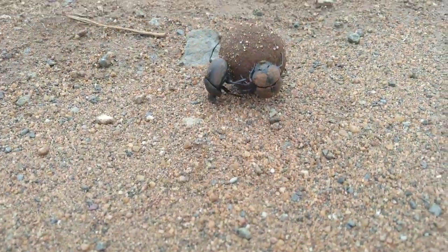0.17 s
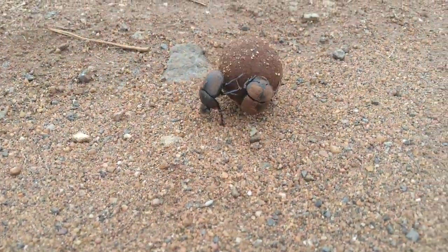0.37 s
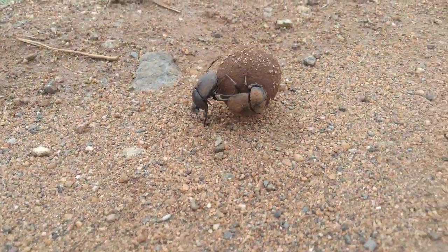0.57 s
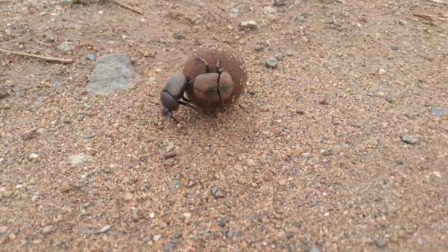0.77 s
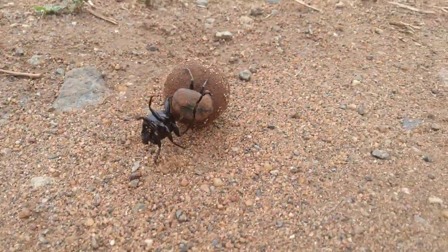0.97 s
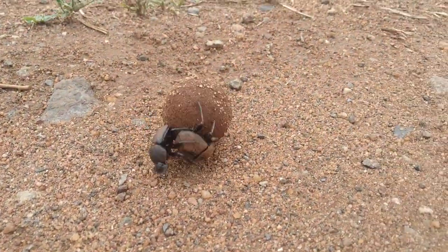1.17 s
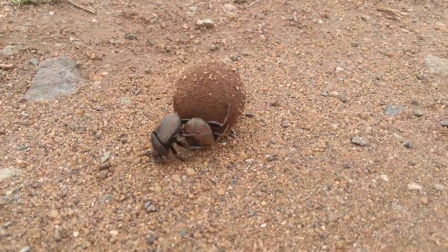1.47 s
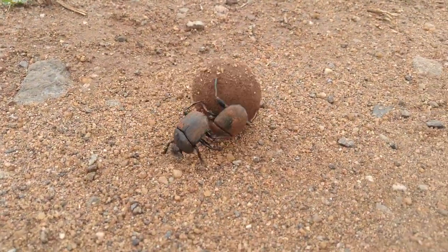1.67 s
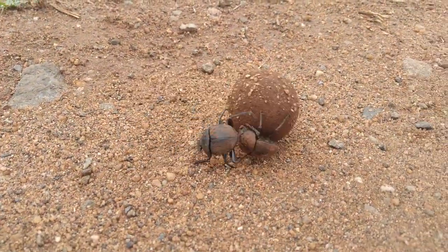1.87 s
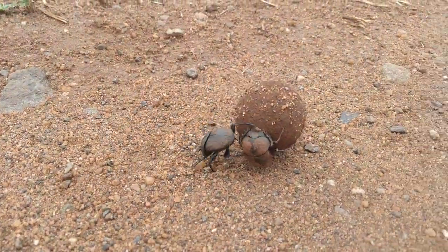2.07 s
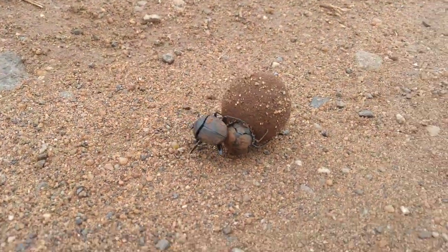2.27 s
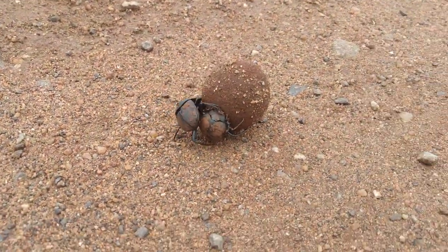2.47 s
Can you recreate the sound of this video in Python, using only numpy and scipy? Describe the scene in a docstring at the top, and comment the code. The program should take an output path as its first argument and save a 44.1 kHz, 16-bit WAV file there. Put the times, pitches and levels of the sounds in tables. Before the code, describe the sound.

A shoe crunches and grinds on gravel close to the left microphone, sparse at first, then dense with sharp snaps and dull knocks; before it, faint birds, insect whirr and distant engine rumble outdoors.

```python
"""A gravel track, close to the ground: a shoe shifts and grinds on the stones beside the left microphone.
Its stones snap as short tone bursts, its grit is many ringing grains, its sole knocks as low bursts.
Birds call, louder on the left, as gliding sines and a warble of overtones; small dry ticks sit to the right.
Insects whirr far up in noise resonances and a distant engine rumbles in wavering sines over low noise.
The treble background and the grinding swell and cut off together."""
import sys
import numpy as np
from scipy import signal
from scipy.fft import rfft, irfft
from scipy.io import wavfile

SR = 44100
rng = np.random.default_rng(int(sys.argv[2]) if len(sys.argv) > 2 else 0)


def transcribe(u):
    """Save the signal u as a 16-bit wav file named by the first command-line argument.

    u: samples, shape (n,) or (channels, n), limited to [-1, 1]; the rate is SR.
    q: integer samples, one column per channel.
    """
    v = np.clip(np.atleast_2d(u).T, -1, 1)
    q = np.round(v * 32767).astype(np.int16)
    wavfile.write(sys.argv[1], SR, q)


N = 115542  # samples, about 2.6 s


def from_db(db):
    """Turn dB into gain."""
    return 10 ** (np.asarray(db) / 20)


def rms_one(x):
    """Scale to rms 1."""
    return x / np.sqrt(np.mean(x ** 2) + 1e-20)


def at_hz(points, hz):
    """Read a table on a log-frequency axis."""
    table = np.array(points)
    return np.interp(np.log(hz), np.log(table[:, 0]), table[:, 1])


def spectrum_hz():
    """Frequencies of the spectrum bins, nudged off zero for the logarithm."""
    return np.arange(N // 2 + 1) * SR / N + 1e-3


def shape(x, points):
    """Colour a signal by a (Hz, dB) table, silent more than an octave outside it."""
    hz = spectrum_hz()
    inside = (hz > points[0][0] / 2) & (hz < points[-1][0] * 2)
    return irfft(rfft(x) * from_db(at_hz(points, hz)) * inside, N)


def pair(a, b, alike, right_db, lead):
    """Left is a; right mixes a, turned in phase, and unrelated b by likeness, then takes its own colour."""
    hz = spectrum_hz()
    likeness = np.clip(at_hz(alike, hz), 0, 1)
    shared = likeness * np.exp(-1j * at_hz(lead, hz)) * rfft(a)
    unrelated = np.sqrt(1 - likeness ** 2) * rfft(b)
    right = irfft((shared + unrelated) * from_db(at_hz(right_db, hz)), N)
    return np.array([a, right])


def drift(rate_hz):
    """Smoothed random wander of spread 1: noise through two equal one-pole lowpasses."""
    r = np.exp(-2 * np.pi * rate_hz / SR)
    noise = rng.standard_normal(N + SR)
    return rms_one(signal.lfilter([1], [1, -2 * r, r * r], noise)[SR:])  # drop the first second of settling


def ring(x, hz, t60):
    """A two-pole resonance: a unit click sets a sine of starting height 1 dying by 60 dB in t60 seconds."""
    r, w = from_db(-60 / (t60 * SR)), 2 * np.pi * hz / SR
    return signal.lfilter([0, np.sin(w)], [1, -2 * r * np.cos(w), r * r], x + 1e-18)


def narrow(hz, width_hz):
    """Two channels of noise in one resonance, rms 1."""
    noise = rng.standard_normal((2, N + SR))
    return rms_one(ring(noise, hz, np.log(1000) / (np.pi * width_hz))[:, SR:])


def burst(t, hz, rise, fall, phase):
    """A tone under a lopsided bell that is highest, at 1, at t = 0."""
    bell = np.exp(-(t / np.where(t < 0, rise, fall)) ** 2)
    return bell * np.cos(2 * np.pi * hz * t + phase)


def add(out, s, x):
    """Mix x in at a time in seconds."""
    i = int(s * SR)
    out[..., i:i + x.shape[-1]] += x[..., :out.shape[-1] - i]


# Colour of the low far-off noise. Each row: frequency in Hz, level in dB per Hz.
RUMBLE_COLOUR = [(7.1, -9), (12, -6), (33, -8), (42, -16.5), (49, -10.5), (86, -15), (124, -26.5),
                 (253, -30), (281, -35), (311, -36.5), (406, -34), (1600, -62), (2080, -76), (3520, -120)]
RUMBLE_DB = -46.5  # rms of that noise before its upper part drifts
# Level of the upper rumble, used relative to its mean. Each row: time in seconds, level in dB.
MURMUR = [(0.0, -75), (0.516, -77.5), (0.852, -73.5), (1.06, -70.5), (1.548, -72.5), (1.7, -76)]
# Lines of the distant engine. Each row: frequency in Hz, rate of wavering in Hz, middle level in dB.
ENGINE_LINES = [(25.62, 1.35, -45.5), (54.5, 1.45, -54.5), (78.47, 3.9, -60.5), (102.3, 1.66, -60),
                (139.5, 5.2, -64), (285.1, 3.4, -69.5)]
ENGINE_WANDER_RAD, ENGINE_WAVER_DB = 1.75, 4  # spread of each line's phase and level


def rumble():
    """Broad low noise whose upper part drifts in level, with the wavering lines of a far engine."""
    t = np.arange(N) / SR
    noise = from_db(RUMBLE_DB) * rms_one(shape(rng.standard_normal((2, N)), RUMBLE_COLOUR))
    low = signal.sosfiltfilt(signal.butter(2, 500, fs=SR, output="sos"), noise)
    s, db = np.transpose(MURMUR)
    out = low + from_db(np.interp(t, s, db - db.mean())) * (noise - low)
    for hz, waver_hz, db in ENGINE_LINES:
        for side in out:
            phase = 2 * np.pi * (hz * t + rng.random()) + ENGINE_WANDER_RAD * drift(waver_hz)
            level = from_db(db + ENGINE_WAVER_DB * drift(waver_hz))
            side += np.sqrt(2) * level * np.sin(phase)
    return out


# Colour of the open-air hiss. Each row: frequency in Hz, level in dB.
AIR_COLOUR = [(900, 4), (1300, -4.2), (2000, 2.5), (3500, 8.5), (5500, -1), (8000, -5), (11000, -8.5),
              (15500, -28)]
# Insects far up. Each row: resonance in Hz, width in Hz, level in dB relative to INSECT_DB.
INSECT_BANDS = [(6800, 37, -46), (7270, 73, 0), (7640, 43, -0.5), (8140, 320, -0.5), (8760, 100, -0.5),
                (9000, 42, -13.5)]
AIR_DB, INSECT_DB = -71, -81.5  # before the swell


def treble():
    """Open-air hiss as coloured noise, and insect whirr as noise in narrow resonances."""
    air = from_db(AIR_DB) * rms_one(shape(rng.standard_normal((2, N)), AIR_COLOUR))
    whirr = sum(from_db(db) * narrow(hz, width_hz) for hz, width_hz, db in INSECT_BANDS)
    return air + from_db(INSECT_DB) * whirr


# The treble opens up and cuts off. Each row: start in seconds, end in seconds, rise in seconds, gain in dB.
SWELLS = [(-.05, 0.027, .02, 4.5), (0.16, 0.236, .025, 2.5), (.352, 0.37, 0.016, -2.5),
          (0.419, 0.539, 0.045, 5), (0.748, 0.766, .008, -5), (0.775, 0.818, .015, 1),
          (0.844, 0.954, 0.024, 6.5), (0.966, 0.992, .008, -5.5), (1.045, 1.121, 0.045, 0.5),
          (1.13, 1.158, .008, 0.5), (1.148, 1.268, 0.075, 6.5), (1.29, 1.37, 0.045, 5.2),
          (1.393, 1.505, 0.019, 3.7), (1.509, 1.529, .004, -2), (1.534, 1.607, 0.021, 2.5),
          (1.696, 2.7, 0.019, 7.03)]
SHUT_DB, CUT_S, FLICKER_DB = -12.5, 0.0058, 0.5  # gain between swells, length of the cut, spread of flicker


def swell():
    """Gain of the treble background and the grinding: slower rise, fast cut, a little flicker."""
    t, level_db = np.arange(N) / SR, np.full(N, float(SHUT_DB))
    for start, end, rise, db in SWELLS:
        openness = np.clip(np.minimum((t - start) / rise, (end + CUT_S - t) / CUT_S), 0, 1)
        level_db = np.maximum(level_db, SHUT_DB + (db - SHUT_DB) * openness)
    return from_db(level_db + FLICKER_DB * drift(20))


# Falling whistles, one list per call. Each row: time in seconds, pitch in Hz, level in dB before panning.
WHISTLES = [
    [(0.0, 3500, -62), (0.01, 3350, -74), (0.018, 3070, -62), (0.026, 2940, -76), (0.034, 2980, -111)],
    [(0.338, 2810, -100), (0.35, 2880, -84), (0.368, 2575, -72), (0.378, 2480, -90)],
    [(0.405, 5060, -102), (0.437, 4400, -72.5), (0.451, 4070, -70), (0.501, 3560, -59.5),
     (0.533, 3000, -61), (0.542, 2976, -84)],
    [(0.776, 2990, -85), (0.784, 2980, -67), (0.794, 2958, -71), (0.808, 2550, -64), (0.816, 2453, -73),
     (0.824, 2435, -84)],
    [(0.845, 4790, -90), (0.855, 4780, -76.5), (0.905, 4020, -64.5), (0.925, 3605, -60),
     (0.947, 3058, -61.5), (0.958, 2930, -82)],
]
# A quick warble. Each row: time in seconds, fundamental in Hz, level in dB before overtones and panning.
WARBLE = [(.16, 820, -94), (.17, 659, -73), (.178, 516, -70), (.183, 519, -71.5), (.19, 733, -66),
          (.2, 812, -73), (.21, 856, -70), (.214, 780, -69), (.219, 573, -70), (.226, 655, -70.5),
          (.232, 520, -69), (.238, 527, -102)]
# Its overtones; the fundamental is absent. Each row: multiple of the fundamental, level in dB.
WARBLE_ORDERS = [(3, -3), (4, -7), (5, -16), (6, -8), (7, -3)]
# The throat colours those overtones. Each row: frequency in Hz, gain in dB.
THROAT = [(1500, -22), (2000, -23), (2500, -2.5), (3000, 1), (3600, 5), (4600, 3.5), (6000, -0.5)]
# Fainter calls farther off. Each row: start in seconds, length in seconds, from Hz, to Hz,
# level in dB before panning.
FAR_CALLS = [(0.745, 0.022, 3050, 3000, -82), (0.835, 0.027, 3000, 2830, -82),
             (1.179, 0.052, 5500, 4300, -76), (1.212, 0.045, 4200, 3520, -69.5),
             (1.17, 0.11, 3110, 2870, -74.5), (1.31, 0.066, 2820, 2680, -69),
             (1.403, 0.11, 2830, 2710, -63.5)]
BIRD_PAN_DB, BIRD_LAG_S, BIRD_ROUGH = 6.5, .0005, 0.24  # left up and right down, left later, level spread
FAR_BLUR_HZ, FAR_WANDER_HZ = 160, 50  # rate of the blur, spread of the pitch


def near_call(t, rows, orders):
    """One gliding call: sines at multiples of a pitch that follows the rows."""
    s, hz, db = np.transpose(rows)
    edge = np.clip(np.minimum(t - s[0] + .003, s[-1] + 0.0058 - t) / 0.0024, 0, 1)
    pitch = np.interp(t, s, hz)
    phase = 2 * np.pi * np.cumsum(pitch) / SR
    tone = 0
    for k, order_db in orders:
        throat_db = at_hz(THROAT, k * pitch) if k > 1 else 0
        tone = tone + from_db(order_db + throat_db) * np.sin(k * phase)
    return np.sqrt(2) * edge * from_db(np.interp(t, s, db)) * tone


def birds():
    """Whistles are near sines, the warble a stack of overtones, far calls blurred glides; louder on the left."""
    out, t = np.zeros(N), np.arange(N) / SR
    rough = 1 + BIRD_ROUGH * drift(300)
    for whistle in WHISTLES:
        out += near_call(t, whistle, [(1, 0)])
    out += near_call(t, WARBLE, WARBLE_ORDERS)
    blur, wander_hz = drift(FAR_BLUR_HZ), FAR_WANDER_HZ * drift(38.4)
    for s, length, from_hz, to_hz, db in FAR_CALLS:
        u = np.clip((t - s) / length, 0, 1)
        envelope = 2 * np.sqrt(np.sin(np.pi * u).clip(0))
        phase = 2 * np.pi * np.cumsum(from_hz + (to_hz - from_hz) * u + wander_hz) / SR
        out += from_db(db) * envelope * blur * np.sin(phase)
    out *= rough
    left = np.interp(t - BIRD_LAG_S, t, out) * from_db(BIRD_PAN_DB)
    return np.array([left, out * from_db(-BIRD_PAN_DB)])


# Tiny dry ticks high up, perhaps insect legs on grit. Each row: time in seconds, height in dB before panning.
TICKS = [(0.622, -71), (0.6694, -65), (0.695, -74), (0.7587, -76), (0.7876, -64), (0.864, -63),
         (0.892, -63), (0.9044, -58), (0.95, -63), (1.2353, -56), (1.2547, -56.5), (1.3139, -62.5),
         (1.3428, -57.5), (1.3594, -60), (1.4962, -53.5), (1.5164, -62)]
TICK_HZ, TICK_T60_S, TICK_PAN_DB = 9360, 0.0018, -11.5  # left gain; the right gets the opposite


def ticks():
    """Short bright clicks, each setting one high resonance ringing, mostly on the right."""
    clicks = np.zeros(N)
    for s, db in TICKS:
        clicks[int(s * SR)] = from_db(db)
    return ring(clicks, TICK_HZ, TICK_T60_S) * from_db([[TICK_PAN_DB], [-TICK_PAN_DB]])


# Pressure of the shoe, as level of the fine grinding before the swell. Each row: time in seconds, level in dB,
# gain of the low part in dB, grains per second before clumping.
GRIND = [(1.3, -67.5, 4.5, 640), (1.5, -67.5, 2.5, 580), (1.62, -67.5, 7, 390), (1.711, -78, 2, 1280),
         (1.72, -60.5, 11.5, 860), (1.81, -66.5, -12, 860), (1.85, -56, 1, 1630), (1.9, -58, -3, 980),
         (1.96, -57.5, 4.5, 2100), (1.975, -47.5, -25, 1800), (2.061, -52, 1, 2660), (2.089, -43, -4, 2200),
         (2.2, -48.5, -2.5, 1950), (2.328, -42.5, -0.5, 2000), (2.398, -55.5, 2, 1800),
         (2.41, -54, 5, 4300), (2.498, -61, -19, 1740), (2.521, -42.5, 4, 5100), (2.562, -41.5, 5.7, 7900),
         (2.62, -39, -6, 6600)]
# Colour of the gravel. Each row: frequency in Hz, gain in dB.
GRIT = [(180, 1), (300, -6.5), (440, -10.5), (502, -10.5), (678, -9.5), (946, -8), (1690, -8.5), (1900, -2),
        (2880, 0), (4440, -6.5), (5520, -22), (8500, -14.5), (16000, -40.5)]
GRAIN_SPREAD_DB, GRAIN_CYCLES = 4.0, 3.55  # spread of grain size, cycles for a grain to die by 60 dB
CLUMP_DB, CLUMP_DRIFT_HZ, CLUMPY_BELOW_PER_S = 3.5, 90, 2000  # denser grinding clumps less


def grind():
    """Uneven grains, clumped, each ringing briefly near its own pitch, through the colour of the gravel."""
    s, *columns = np.transpose(GRIND)
    db, low_db, rate = (np.interp(np.arange(N) / SR, s, c) for c in columns)
    clump_db = CLUMP_DB * np.minimum(CLUMPY_BELOW_PER_S / rate, 1) * drift(CLUMP_DRIFT_HZ)
    born = rng.random((2, N)) < rate * from_db(clump_db) / SR
    size = from_db(GRAIN_SPREAD_DB * np.minimum(rng.exponential(1, (2, N)), 4))
    grains = born * size * rng.choice([-1, 1], (2, N)) / np.sqrt(rate)
    dealt = rng.integers(0, 10, (2, N))
    rings = np.zeros((2, N))
    for k, hz in enumerate(np.geomspace(500, 13000, 10)):
        struck = grains * (abs(dealt - k) <= 1)  # a grain also rings the neighbouring pitches
        slope = np.diff(ring(struck, hz, GRAIN_CYCLES / hz), prepend=0)
        rings += np.sqrt(hz) * slope / np.sin(np.pi * hz / SR)
    x = rms_one(shape(rings, GRIT))
    bass = signal.sosfilt(signal.butter(2, 1100, fs=SR, output="sos"), x)
    started = np.arange(N) > s[0] * SR
    return started * from_db(db) * (x + (from_db(low_db) - 1) * bass)


# The sole knocks on the ground. Each row: time in seconds before THUD_LATE_S, peak in dB before THUD_DB
# and panning, pitch in Hz.
THUDS = [(1.334, -38.5, 270), (1.41, -62.5, 252), (1.419, -46.5, 305), (1.719, -32, 528), (1.732, -48, 920),
         (1.762, -38.5, 750), (1.978, -27.5, 486), (1.985, -28, 860), (2.03, -21.5, 556),
         (2.073, -32, 1070), (2.095, -35.5, 540), (2.183, -29.5, 990), (2.219, -33, 1190),
         (2.274, -60, 326), (2.302, -35, 516), (2.325, -30.5, 638), (2.34, -26.5, 760), (2.365, -38.5, 541),
         (2.385, -39.5, 676), (2.59, -28.5, 780), (1.335, -39.5, 143), (1.335, -44, 670),
         (2.341, -34.5, 300)]
THUD_RISE_CYCLES, THUD_FALL_CYCLES = 0.17, 1.32
THUD_LATE_S, THUD_DB = 0.00308, -1.7
THUD_PAN_DB, THUD_LAG_S = .8, 0.00011  # left up and right down, right later


def thuds():
    """Soft low knocks, short lopsided tone bursts reaching the right side a little later."""
    out, t = np.zeros((2, N)), np.arange(-512, 1536) / SR - [[0], [THUD_LAG_S]]
    for s, db, hz in THUDS:
        knock = burst(t, hz, THUD_RISE_CYCLES / hz, THUD_FALL_CYCLES / hz, 0)
        add(out, s + THUD_LATE_S - 512 / SR, from_db(db + THUD_DB) * knock)
    return out * from_db([[THUD_PAN_DB], [-THUD_PAN_DB]])


# Stones snap under the shoe. Each row: time in seconds, level in dB before SNAP_DB, ring in Hz,
# edge in dB and sparkle in dB, both relative to the ring.
SNAPS = [(1.3373, -40.5, 1600, -28, -22), (1.4133, -35.5, 2140, -7.5, -34), (1.4217, -41.5, 1730, -23, -34),
         (1.5678, -41.5, 3200, -26, -27), (1.5699, -37.5, 2600, -24, -25), (1.5861, -38, 3050, -20, 0),
         (1.591, -45.5, 2860, -24, -1), (1.7197, -30, 3320, -9, -6), (1.7212, -19.5, 3180, -26, -28),
         (1.7226, -26.5, 3000, -50, -26), (1.759, -49, 2660, -17, -28), (1.7632, -24, 3240, -19, -43),
         (1.7647, -19, 2480, -38, -45), (1.8221, -24, 3300, -10, -16), (1.8372, -29, 3060, -12, -21),
         (1.8461, -28, 2720, -26, -6), (1.8482, -24, 3240, -24, -21), (1.8515, -24, 3500, -21, -24),
         (1.8654, -34, 2830, -8, -12), (1.9092, -26, 3270, -10, -12), (1.965, -25.5, 2960, -11, -17),
         (1.9805, -14.5, 3080, -6, -5), (1.983, -16, 3460, -9, -12), (1.9848, -30, 3040, -15, -10),
         (1.9869, -12, 3380, -21, -15), (1.9991, -35, 3260, -16, 2), (2.0178, -53, 2580, -19, -22),
         (2.0256, -31, 3310, -17, -21), (2.0317, -10, 2900, -11.5, -17), (2.0336, -2.5, 3450, -29, -28),
         (2.0351, -25, 3380, -25, -34), (2.0556, -26.5, 3110, -14, -5), (2.0654, -28, 2680, -17, -19),
         (2.0682, -19.5, 2570, -28, -29), (2.0766, -16.5, 2870, -18, -22), (2.0777, -19, 3010, -20, -12),
         (2.0866, -27.5, 3070, -16, -5), (2.0977, -22, 2220, -5.5, -18), (2.1137, -27, 2920, -5, -19),
         (2.1289, -37, 2750, -15, -31), (2.1614, -26, 3350, -9, -24), (2.1658, -33, 2780, -27, -25),
         (2.1703, -24.5, 2050, -23, -12), (2.1864, -37, 1730, -17, -2), (2.1929, -12, 2470, -15.5, -22),
         (2.1957, -22, 2570, -20, -13), (2.2068, -21, 2900, -20, -16), (2.2194, -14, 3480, -23, -15),
         (2.2231, -10, 2830, -24, -26), (2.2244, -18, 1780, -26, -31), (2.2398, -29, 3450, -22, -28),
         (2.2446, -1, 3060, -22, -22), (2.2669, -32, 3180, -12, -19), (2.2732, -28, 2820, -6, -17),
         (2.2757, -25, 2430, -14, -6), (2.3048, -28, 2520, -10, -31), (2.3216, -30, 1880, -18, -4),
         (2.3274, -10, 2320, -16, -19), (2.3417, -33, 2210, -13, -10), (2.3434, -15.5, 3330, -14, -65),
         (2.3683, -24.5, 2160, -13.5, -18), (2.3698, -27, 2440, -16, -9), (2.3865, -22.5, 2420, -17, -17),
         (2.3947, -24, 3500, -27, -27), (2.4036, -30, 3020, -14, -23), (2.434, -30.5, 2980, -23, -20),
         (2.5072, -20.5, 3260, -29, -37), (2.5203, -26, 2900, -32, -43), (2.523, -20.5, 3030, -34, -36),
         (2.5302, -24, 2500, -21, -15), (2.539, -27, 2600, -25.5, -34), (2.5715, -29, 2440, -31, -32),
         (2.5901, -29, 1840, -30, -31), (2.5919, -15, 2740, -25, -19), (2.6097, -32, 2300, -33, -25),
         (1.4405, -42.5, 2680, -23, -20), (1.453, -46, 1930, -23, -20), (1.4895, -39, 3300, -24, -5),
         (1.733, -44, 1600, -13, -36), (1.9797, -15.5, 2840, -5.5, -18), (1.9814, -14.5, 3540, -25, -3),
         (1.9879, -19, 3800, -11, -13), (1.7205, -26, 1460, -23, -1), (1.874, -38, 2600, -14, -18),
         (1.894, -34, 2500, -11, -16), (1.745, -41, 3400, -14, -21), (1.935, -33.5, 2500, -9, -15),
         (2.4295, -54, 2600, -19, -17), (2.4865, -35, 3280, -12, -18)]
SNAP_DB, SNAP_TOP_HZ = -1.53, 10400  # overall trim, lowpass
SNAP_RISE_CYCLES, SNAP_FALL_CYCLES = .65, 1.25
EDGE_HZ, SPARKLE_HZ, BRIGHT_S = 5420, 8500, .00045  # BRIGHT_S is the fall of both
SCATTER_DB, SCATTER_PER_DB = -29.5, 0.89  # weak snaps scatter more
SCATTER_S, SCATTER_CYCLES = 0.0014, 6  # decay of the grit, cycles for its ring to die by 60 dB


def snaps():
    """Each snap: a burst of a cycle or two, two brighter bursts, then scattered grit; row two differs by chance."""
    out, t = np.zeros((2, N)), np.arange(-64, 448) / SR
    draws = rng.standard_normal((len(SNAPS), 2, len(t) + 3))
    for (s, db, hz, edge_db, sparkle_db), draw in zip(SNAPS, draws):
        phase = np.pi * draw[:, :3, None]
        x = burst(t, hz, SNAP_RISE_CYCLES / hz, SNAP_FALL_CYCLES / hz, phase[:, 0])
        x += from_db(edge_db) * burst(t, EDGE_HZ, BRIGHT_S / 2, BRIGHT_S, phase[:, 1])
        x += from_db(sparkle_db) * burst(t, SPARKLE_HZ, BRIGHT_S / 2, BRIGHT_S, phase[:, 2])
        scatter = np.diff(draw[:, 2:]) * (t > 0) * np.exp(-t / SCATTER_S)
        grit = ring(scatter, hz, SCATTER_CYCLES / hz)
        share = from_db(SCATTER_DB - SCATTER_PER_DB * db)
        snap = (x + share * grit) / np.sqrt(1 + share ** 2)
        add(out, s + t[0], from_db(db + SNAP_DB) * snap)
    return signal.sosfilt(signal.butter(2, SNAP_TOP_HZ, fs=SR, output="sos"), out)


# The right microphone hears the shoe shadowed. Each row: frequency in Hz, gain in dB.
SHADOW = [(300, -1), (700, -3), (1400, -8), (3000, -12), (6000, -9), (10000, -10), (15000, -7)]
# Likeness of the two sides, shoe then far field. Each row: frequency in Hz, likeness from 0 to 1.
NEAR_ALIKE = [(300, .97), (700, .93), (1400, .8), (3000, .75), (7000, .4), (15000, .3)]
FAR_ALIKE = [(25, 1), (60, 0.3), (125, 1), (300, 0.84), (600, 0.71), (1200, 0), (3000, 0), (15000, 0)]
# The left side leads, shoe then far field. Each row: frequency in Hz, lead in radians.
NEAR_LEAD = [(200, 1.2), (500, -0.54), (1000, 1.9), (1400, 0.18), (2200, 1.58), (4000, 0.21), (5000, 0.74)]
FAR_LEAD = [(25, 0.1), (60, 0.9), (125, 0.28), (300, 0.12), (700, 0.29)]
# Balance of the far field. Each row: frequency in Hz, left minus right in dB.
FAR_BALANCE = [(25, -3.5), (60, 0.5), (300, -0.15), (1300, 2.5), (3000, 6.5), (8000, 4), (15000, -5)]


def scene():
    """Shoe near the left microphone, the far field all round."""
    opening = swell()
    far_right_db = [(hz, -db) for hz, db in FAR_BALANCE]
    far = pair(*(opening * treble() + rumble()), FAR_ALIKE, far_right_db, FAR_LEAD)
    shoe = pair(*(snaps() + opening * grind()), NEAR_ALIKE, SHADOW, NEAR_LEAD)
    return far + birds() + ticks() + shoe + thuds()


def record(dry):
    """The top is cut by a steep lowpass, 60 dB down from 16300 Hz."""
    return signal.sosfilt(signal.cheby2(14, 60, 16300, fs=SR, output="sos"), dry)


dry = scene()
out = record(dry)
transcribe(out)
```